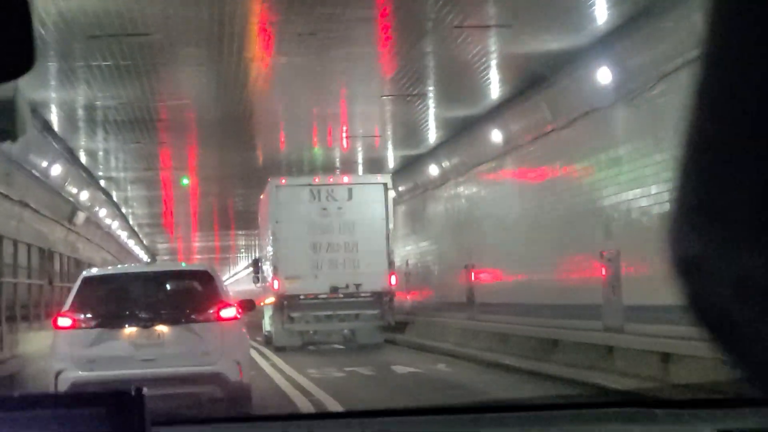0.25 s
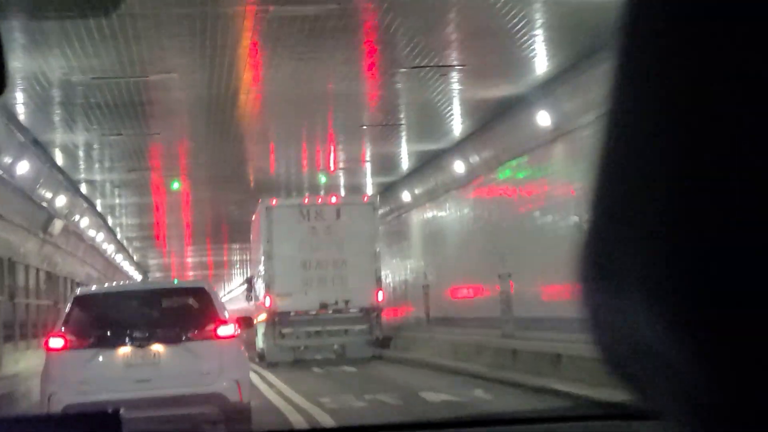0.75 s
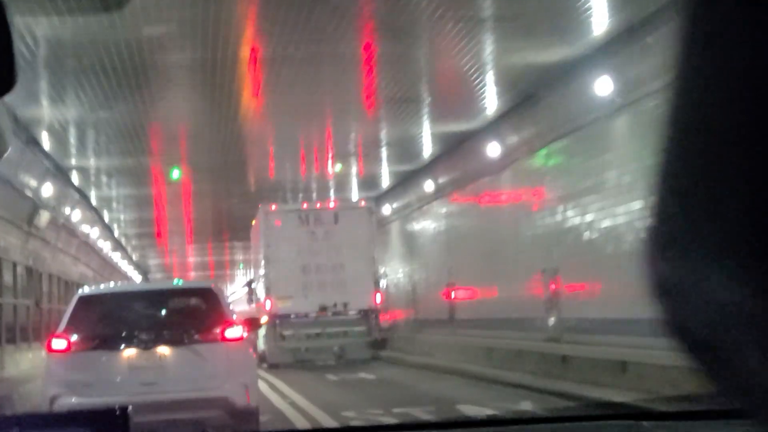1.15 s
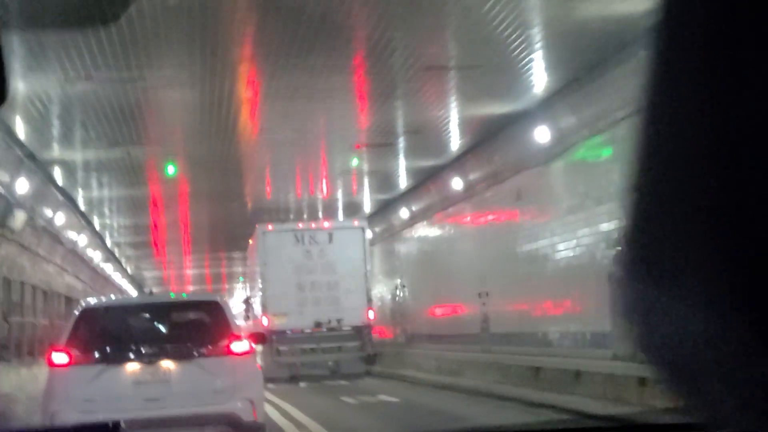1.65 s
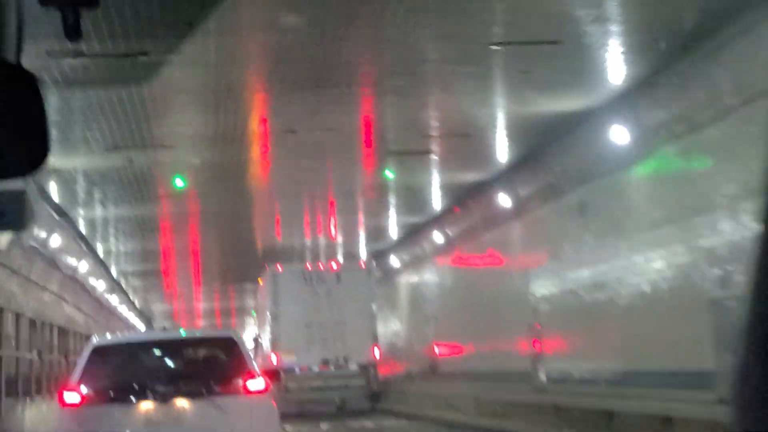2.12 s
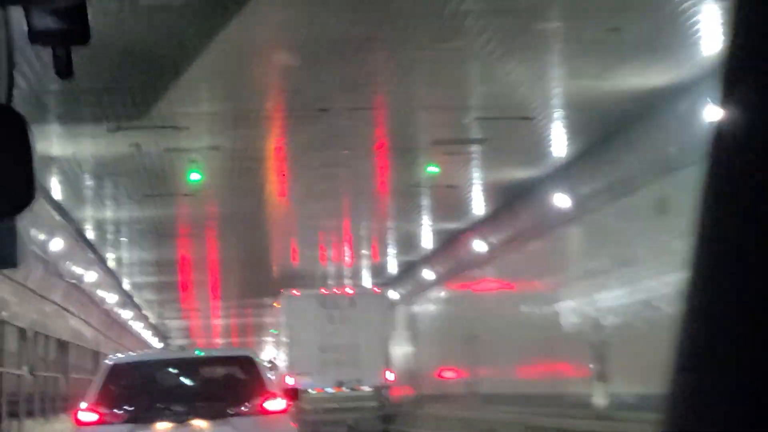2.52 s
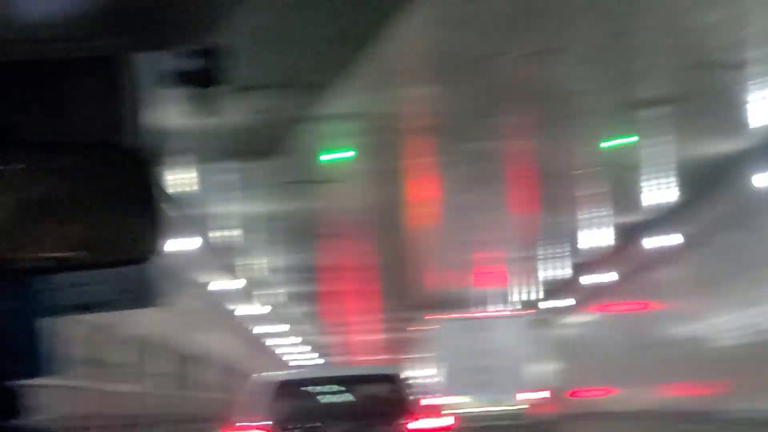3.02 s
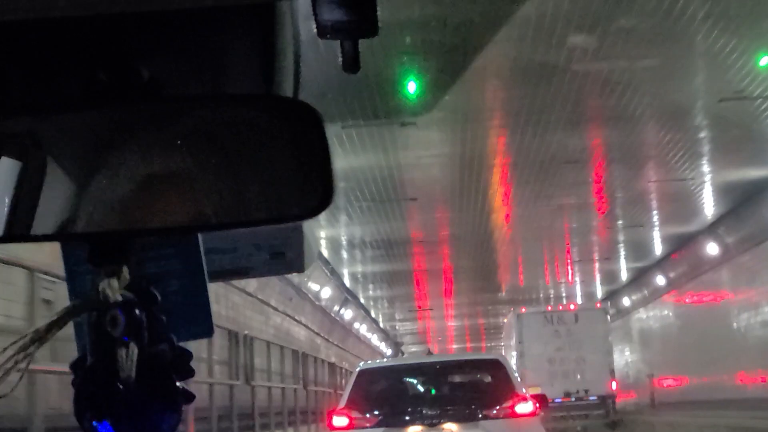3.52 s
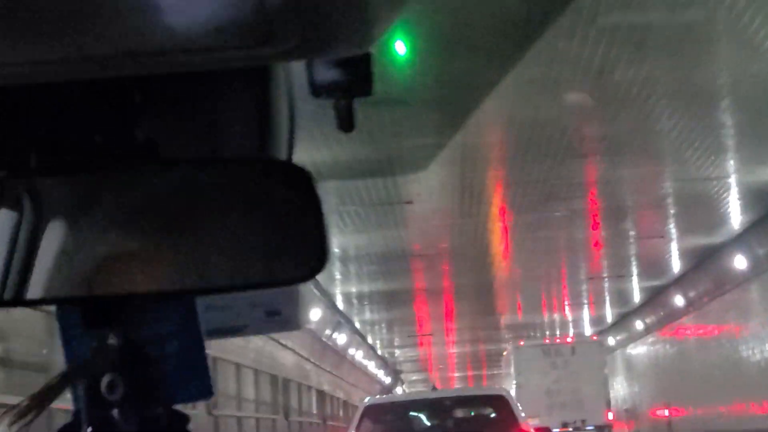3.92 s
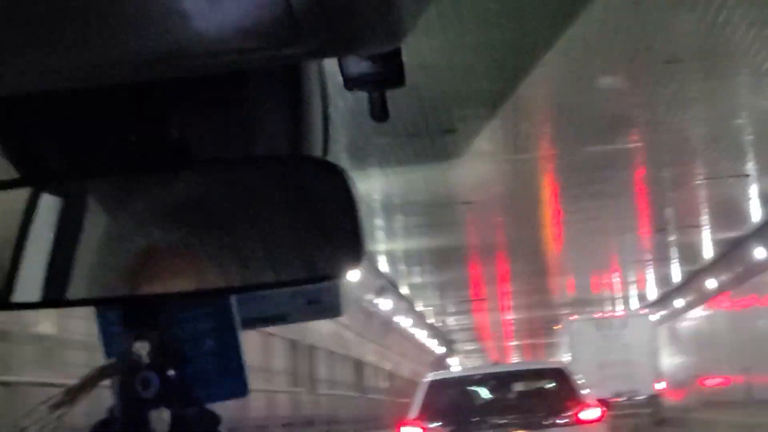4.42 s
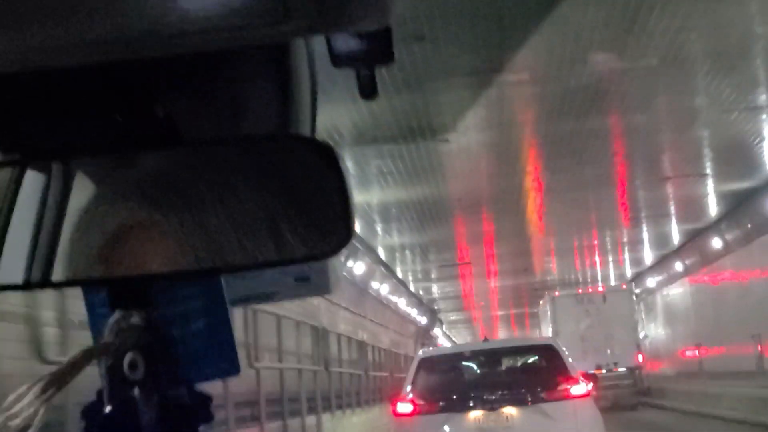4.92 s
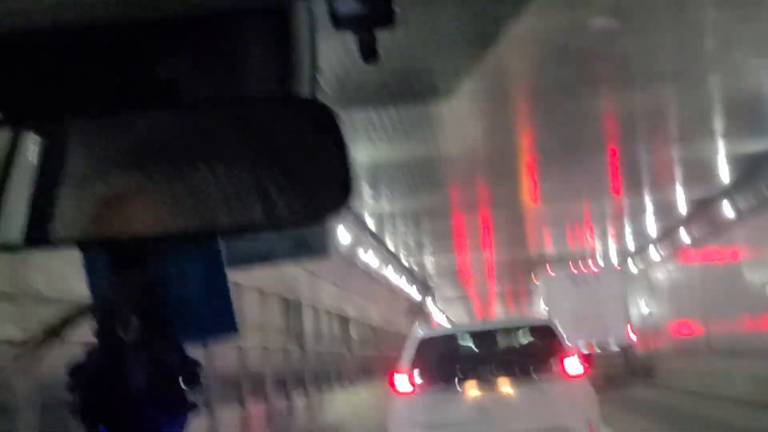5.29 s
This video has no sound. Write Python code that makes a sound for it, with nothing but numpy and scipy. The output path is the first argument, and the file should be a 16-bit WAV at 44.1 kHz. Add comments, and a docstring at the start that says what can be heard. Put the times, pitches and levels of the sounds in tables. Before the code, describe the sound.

A close stereo microphone in the front of a moving car captures deep, uneven road rumble and a wavering cabin boom for about 5.5 seconds. Boom is strongest around 0.5 seconds, when the tyre roar also swells. A higher engine-like drone runs until about 1.9 seconds, then gives way to a lower, fainter hum from 2.2. Between roughly 0.85 and 1.6 seconds, plastic trim gives a faint quick run of dry, bright ticking scrapes, slowing slightly, over a trace of cloth hiss. Air hiss drops around 2 seconds, and muffled tyre rush from tunnel traffic builds towards 3. Soft sleeve rubs come near 2.7 and 3.5-3.7, then clearer grainy brushes at 4.4-4.6 and 5.2-5.5, leaning right. Tiny high clicks fall near 2.9, 3.3, 3.5 and 5.0. A low throb joins between 3.3 and 5.3 seconds. The rumble continues until the end.

```python
"""Car cabin in a road tunnel

Low road noise drums and roars as shaped noise; the cabin booms and drones as wavering sine tones.
A sleeve brushes the right microphone port as grainy noise, trim creaks in a run of faint ringing scrapes,
and small things click as brief narrow rings. Behind them, traffic in the tube is broad noise bands.
A limiter holds the peaks down.
"""
import sys
import numpy as np
from scipy import signal
from scipy.fft import rfft, irfft, next_fast_len
from scipy.io import wavfile
from scipy.ndimage import uniform_filter1d, minimum_filter1d, map_coordinates

SR = 44100
rng = np.random.default_rng(int(sys.argv[2]) if len(sys.argv) > 2 else 0)


def to_wav(sig):
    """Store sig (one row per channel, or 1-D mono) as 16-bit WAV at the path in sys.argv[1].

    Samples outside -1..1 are clipped; the rate is SR.
    """
    pcm = np.clip(np.atleast_2d(sig), -1, 1) * 32767
    pcm = np.round(pcm).astype(np.int16)
    wavfile.write(sys.argv[1], SR, pcm.T)  # frames by channels


N = 244755


def amp(db):
    """Turn decibels into a gain."""
    return 10 ** (np.asarray(db) / 20)


def unit(x):
    """Scale to rms 1."""
    return x / np.sqrt(np.mean(x ** 2) + 1e-20)


def along(points, hz):
    """Read a curve of (frequency, value) points on a log frequency axis."""
    f, v = np.transpose(points)
    return np.interp(np.log(hz + 1), np.log(f + 1), v)


def curves(rows):
    """Draw one automation curve per column after the time, a value per sample."""
    times, *columns = np.transpose(rows)
    t = np.arange(N) / SR
    return [np.interp(t, times, column) for column in columns]


def during(rows, fade):
    """Gate to the time span of a table: 1 inside, fading to 0 over `fade` seconds outside."""
    t = np.arange(N) / SR
    inside = np.minimum(t - rows[0][0], rows[-1][0] - t)
    return np.clip(1 + inside / fade, 0, 1)


def wobble(rate):
    """Draw a smooth random curve through `rate` normally distributed knots a second."""
    knots = rng.standard_normal(int(N * rate / SR) + 4)
    return map_coordinates(knots, [np.arange(N) * rate / SR])


def filtered(x, response):
    """Filter x by a response given as a function of frequency."""
    m = next_fast_len(N + SR // 2)
    spectrum = rfft(x, m) * response(np.fft.rfftfreq(m, 1 / SR))
    return irfft(spectrum, m)[..., :N]


def placed(right_db):
    """Gains of the two ports, with a mean of 1, for a source louder on the right."""
    gains = amp([[0], [right_db]])
    return gains / gains.mean()


# how alike left and right are in the cabin noise: (frequency [Hz], correlation [0 to 1])
STEREO_LIKENESS = [(30, 1), (80, 0.97), (170, 0.88), (350, 0.91), (700, 0.63), (1300, 0), (4000, 0)]


def rush(spectrum, patchy_db):
    """Stereo noise with a given spectrum and patches of random gain; its mid signal has rms 1."""
    noise = signal.stft(rng.standard_normal((2, N)), nperseg=512)[2]
    # blur random gains over frequency, then time, into patches shared by both channels
    patches = uniform_filter1d(rng.standard_normal(noise.shape[1:]), size=5, axis=0)
    patches = uniform_filter1d(patches, size=14, axis=1)
    pair = signal.istft(noise * amp(patchy_db * unit(patches)), nperseg=512)[1][:, :N]

    def mid_side(hz):
        # half the angle whose cosine is the left-right correlation
        angle = np.arccos(np.clip(along(STEREO_LIKENESS, hz), -1, 1)) / 2
        return amp(along(spectrum, hz)) * [np.cos(angle), np.sin(angle)]

    mid, side = filtered(pair, mid_side)
    return np.array([mid + side, mid - side]) / np.std(mid)


def tone(rows, waver_db, drift, order=1):
    """A sine line, or a multiple of it, that wavers at random in level and phase."""
    hz, db = curves(rows)
    phase = order * (2 * np.pi * np.cumsum(hz) / SR + drift * wobble(14))
    level = np.sqrt(2) * amp(db + waver_db * wobble(16))  # a sine of rms 1 peaks at root 2
    return level * np.sin(phase) * during(rows, fade=0.44)


# uneven levels of the low road noise: (time [s], shudder level [dB], cabin rumble level [dB])
ROAD_LEVELS = [(0, -19.5, -9.5), (.4, -22, -13), (1.35, -22, -16.5), (1.7, -17.5, -11), (2.05, -21.5, -14),
               (2.5, -15.5, -12.5), (3.05, -26.5, -11.5), (3.6, -17, -13.5), (4.25, -19, -12),
               (4.65, -18, -13.5), (5.55, -22.5, -12)]
# the drive pulls, eases off and pulls again: (time [s], change in roar level [dB])
DRIVE_LOAD = [(0, 1.5), (.4, 3.5), (.65, 0.5), (1.6, .5), (2.0, -1.43), (3.7, -1), (4.2, 0), (5.55, 0.1)]
# spectra of the low shudder, cabin rumble and tyre roar: (frequency [Hz], relative density [dB per Hz])
SHUDDER_SPECTRUM = [(8, -28.5), (20, -3), (30, -1.5), (42, 0.5), (49, 2), (55, -17.5), (70, -34),
                    (120, -71), (400, -120)]
RUMBLE_SPECTRUM = [(35, -48), (55, -17.5), (64, 4), (76, -3.5), (90, 1.5), (105, 0), (125, 0), (143, -9.5),
                   (180, -9), (215, -11), (270, -19), (500, -57.5), (1200, -120)]
ROAR_SPECTRUM = [(90, -51), (180, -7), (235, -1), (300, -1), (360, -5), (430, -4), (510, -3), (590, -9.5),
                 (720, -16), (950, -29), (2000, -64), (4000, -120)]
ROAR_DB = -24  # at a load of 0 dB
SWELL_DB, SWELLS_PER_S = 0.88, 5  # chance swells of the shudder and the rumble


def road():
    """Road noise in three bands: an uneven low shudder and rumble, and a tyre roar that grows with load."""
    shudder_db, rumble_db = curves(ROAD_LEVELS)
    load_db, = curves(DRIVE_LOAD)
    shudder_gain = amp(shudder_db + SWELL_DB * wobble(SWELLS_PER_S))
    rumble_gain = amp(rumble_db + SWELL_DB * wobble(SWELLS_PER_S))
    shudder = shudder_gain * rush(SHUDDER_SPECTRUM, patchy_db=1.6)
    rumble = rumble_gain * rush(RUMBLE_SPECTRUM, patchy_db=0.5) * placed(right_db=1.0)
    roar = amp(ROAR_DB + load_db) * rush(ROAR_SPECTRUM, patchy_db=1.0) * placed(right_db=0.46)
    return shudder + rumble + roar


# tone tracks: (time [s], pitch [Hz], level before the layer's trim [dB])
# the cabin boom: near 80 Hz at first, then lower, wandering and uneven in level
BOOM_TRACK = [(0, 76.2, -12.5), (.25, 80.95, -8.5), (.47, 82, -4), (.55, 81.7, -17.5), (.64, 82.17, -5),
              (1.03, 80.66, -11), (1.2, 81.16, -6.5), (1.43, 81.04, -7), (1.55, 84.23, -17.5),
              (2.05, 71.03, -10.5), (2.25, 70.86, -16.5), (3.2, 66, -16.5), (3.7, 79, -11),
              (4.1, 70.83, -23.5), (4.45, 81, -13), (4.75, 72, -16.5), (4.97, 78, -13), (5.55, 78.54, -12)]
# the higher drone while the drive pulls
DRONE_TRACK = [(0, 182.1, -17), (.27, 201.1, -11.5), (.55, 202, -23), (.8, 198.8, -16), (1.0, 199.2, -23),
               (1.3, 198.2, -24.5), (1.65, 196.4, -16.5), (1.85, 201.9, -26.5)]
# the hum that sets in once the drive eases off
HUM_TRACK = [(2.2, 158.3, -20.5), (3.0, 157.8, -22), (3.45, 158, -28), (3.9, 159.5, -23),
             (4.6, 157.1, -24.5), (5.55, 157.5, -19)]
# a low throb, late in the scene
THROB_TRACK = [(3.3, 44, -24.5), (4.6, 44.06, -17.5), (5.3, 42.3, -26)]


def cabin_tones():
    """Wavering sine lines: a cabin boom, a drone with a faint octave, a hum and a low throb."""
    boom = amp(-0.53) * tone(BOOM_TRACK, waver_db=1.36, drift=0.64)
    drone = amp(-1.14) * tone(DRONE_TRACK, waver_db=1.5, drift=0.5)
    octave = amp(-18) * tone(DRONE_TRACK, waver_db=1.5, drift=0.74, order=2)
    hum = amp(-2.0) * tone(HUM_TRACK, waver_db=1.0, drift=0.18)
    throb = amp(-3.0) * tone(THROB_TRACK, waver_db=5.0, drift=0.2)
    return (boom + drone + octave + hum) * placed(right_db=0.56) + throb


STROKE_DROP_DB = 15  # how far a stroke is down one rise time before its peak, or one fall time after


def stroke(peak, rise, fall):
    """Envelope of one sleeve stroke: swells to 1 at its peak, then dies away, both straight in dB."""
    t = np.arange(N) / SR - peak
    return amp(-STROKE_DROP_DB * np.maximum(-t / rise, t / fall))


# sleeve strokes: (peak time [s], rise [s], fall [s], rub level [dB], hiss level [dB])
SLEEVE_STROKES = [(1.795, 0.066, .08, -61, -67.5), (2.62, 0.12, 0.16, -53, -65.5),
                  (2.72, .12, 0.24, -52.5, -63.5), (3.221, 0.54, .2, -62, -69.5),
                  (3.465, .045, .045, -52, -62.5), (3.725, .09, .07, -49, -65),
                  (4.40, 0.18, 0.12, -43.5, -55), (4.62, .14, 0.16, -42.5, -48),
                  (5.065, 0.11, 0.23, -52.5, -63.5), (5.228, 0.054, 0.067, -44, -62),
                  (5.40, .11, 0.63, -46, -50.5), (5.545, 0.042, 0.083, -42, -46.5)]
# cloth stirring under the creak: (time [s], hiss level [dB])
CLOTH_STIR = [(0.75, -87), (0.95, -76.5), (1.3, -71), (1.75, -75.5), (1.9, -89)]
# spectra of the dull rub and of the bright cloth hiss: (frequency [Hz], relative density [dB per Hz])
RUB_SPECTRUM = [(500, -36.5), (1300, 0), (2000, -2.5), (2600, -4.5), (3400, 0.5), (4100, -4.5), (5000, -8),
                (6000, -18.5), (8000, -42.5), (15000, -65)]
CLOTH_SPECTRUM = [(2000, -22), (4500, -1.5), (5800, 1), (6800, 0.5), (8900, 2.5), (10000, -0.5),
                  (11600, 4.5), (13200, 2), (14300, -3), (15800, 0.5)]
CLUMP_DB, FIBRE_DB = 1.2, 1.5  # grain depth as fibres catch in clumps and one by one


def sleeve():
    """Cloth slides by the right port: a dull rub and a bright hiss, grainy as the fibres catch."""
    stir_db, = curves(CLOTH_STIR)
    rub = np.zeros(N)
    hiss = amp(stir_db) * during(CLOTH_STIR, fade=0.1)
    for peak, rise, fall, rub_db, hiss_db in SLEEVE_STROKES:
        shape = stroke(peak, rise, fall)
        rub = np.hypot(rub, amp(rub_db) * shape)  # overlapping strokes add in power
        hiss = np.hypot(hiss, amp(hiss_db) * shape)
    grain = unit(amp(CLUMP_DB * wobble(60) + FIBRE_DB * wobble(700)))
    dull = rub * rush(RUB_SPECTRUM, patchy_db=0.8) * placed(right_db=7.5)
    bright = hiss * rush(CLOTH_SPECTRUM, patchy_db=0.4) * placed(right_db=12.0)
    return (dull + bright) * grain


# first slip, gap between slips, and how much each gap outlasts the one before
CREAK_S, SLIP_GAP_S, SLIP_SLOWING_S = 0.8425, 0.0585, 0.00085
SLIP_JITTER_S = 0.002
# level of the third slip before filter and trim, the build per slip up to it, the ebb after, the scatter
SLIP_DB, SLIP_BUILD_DB, SLIP_EBB_DB, SLIP_SCATTER_DB = -45, 5, 0.6, 1.5


def slips(count=13):
    """Time [s] and level [dB] of each slip: the trim sticks a little longer every time, give or take."""
    k = np.arange(count)
    late, louder = rng.standard_normal((count, 2)).T
    times = CREAK_S + SLIP_GAP_S * k + SLIP_SLOWING_S * k ** 2 / 2
    levels = SLIP_DB + np.minimum(SLIP_BUILD_DB * (k - 2), -SLIP_EBB_DB * (k - 2))
    return zip(times + SLIP_JITTER_S * late, levels + SLIP_SCATTER_DB * louder)


# the plastic trim's modes: (frequency [Hz], width [Hz], relative level [dB])
TRIM_MODES = [(4900, 900, 3.5), (7300, 900, -7.5), (9300, 380, 1.5), (11200, 1200, -8.5), (13200, 1500, -5)]


def trim_body(f):
    """Size of the trim's response: resonant modes of alternating sign, plus a broad scrape in power."""
    modes = 0
    for k, (centre, width, db) in enumerate(TRIM_MODES):
        damping = 1j * f * width
        modes = modes + (-1) ** k * amp(db) * damping / (centre * centre - f * f + damping)
    return np.hypot(np.abs(modes), amp(along(CLOTH_SPECTRUM, f) - 13.5))


def creak(decay=0.06, rise=0.002):
    """Each slip of the trim is a short noise scrape, part of it ringing in the plastic's modes."""
    scrapes = np.zeros((2, N + SR))
    t = np.arange(SR // 10) / SR
    for s, db in slips():
        shape = amp(db - 60 * t / decay) * (1 - np.exp(-t / rise))  # falls 60 dB in `decay` seconds
        start = round(s * SR)
        scrapes[:, start:start + len(t)] += shape * rng.standard_normal((2, len(t)))
    return amp(4.0) * filtered(scrapes[:, :N], trim_body) * placed(right_db=5.0)


# small clicks of things in the cabin: (time [s], level before trim [dB], pitch [Hz])
CABIN_CLICKS = [(2.8973, -52, 12040), (3.2705, -46, 11860), (3.461, -57, 8700), (4.9654, -53, 8280)]


def clicks(decay=0.06, width_hz=600):
    """Light contacts, each a narrow band of noise that starts at once and dies away fast."""
    out = np.zeros((2, N))
    t = np.arange(N) / SR
    for s, db, hz in CABIN_CLICKS:
        band = lambda f: 1 / (1 + ((f - hz) / width_hz) ** 2)
        ring = unit(filtered(rng.standard_normal((2, N)), band))
        out += ring * (t >= s) * amp(db - 9.5 - 60 * np.abs(t - s) / decay)
    return out * placed(right_db=7)


# traffic beyond the windows: (time [s], tunnel wash level before trim [dB], tyre rush level [dB])
TUNNEL_TRAFFIC = [(0, -38.5, -50), (.5, -40, -55), (1.6, -40.5, -59), (1.95, -43, -54), (3.0, -44.5, -40),
                  (3.7, -44, -39.5), (4.2, -41.5, -43), (4.8, -41.5, -37), (5.55, -40, -40)]
# air and tyre hiss, dropping as the drive eases off: (time [s], level before trim [dB])
AIR_HISS = [(0, -45.5), (1.55, -47), (2.0, -51), (5.55, -50)]
# spectra of the wash, the tyre rush and the hiss: (frequency [Hz], relative density [dB per Hz])
WASH_SPECTRUM = [(300, -46), (600, -8), (780, -1), (950, -3), (1150, -2.5), (1350, -9.5), (1650, -12.5),
                 (2100, -26), (3500, -43), (8000, -120)]
TYRE_SPECTRUM = [(300, -47.5), (540, -8.5), (670, 4), (780, -3.5), (920, -6), (1100, -18.5), (1800, -56.5),
                 (4000, -120)]
HISS_SPECTRUM = [(700, -28), (1400, -0.5), (2000, 3), (2900, 0), (3600, 1), (4300, -0.5), (5300, -7),
                 (5800, -15.5), (6400, -24), (8800, -30), (9900, -32), (11600, -33), (15500, -35)]


def traffic():
    """The tunnel's diffuse wash, a rush of tyres that builds up, and the hiss that gets past the glass."""
    wash_db, tyres_db = curves(TUNNEL_TRAFFIC)
    air_db, = curves(AIR_HISS)
    wash = amp(wash_db + 1.06) * rush(WASH_SPECTRUM, patchy_db=0.56) * placed(right_db=1.0)
    tyres = amp(tyres_db) * rush(TYRE_SPECTRUM, patchy_db=4.0) * placed(right_db=3.5)
    hiss = amp(air_db - 2.5) * rush(HISS_SPECTRUM, patchy_db=0.97) * placed(right_db=3.0)
    return wash + tyres + hiss


def scene():
    """Mix everything heard from the front seat."""
    return road() + cabin_tones() + sleeve() + creak() + clicks() + traffic()


TOP_HZ = 15800  # band limit


def record(dry, ceiling=0.99):
    """A look-ahead limiter rides the peaks; the ends fade briefly; nothing passes above the band limit."""
    needed = np.minimum(1, ceiling / (np.abs(dry).max(axis=0) + 1e-9))
    held = minimum_filter1d(needed, size=600)  # centred windows, so the gain dips ahead of a peak
    gain = uniform_filter1d(held, size=600)
    ends = signal.windows.tukey(N, 160 / N)  # 80 samples of fade at each end
    return filtered(dry * gain * ends, lambda hz: hz < TOP_HZ)


dry = scene()
out = record(dry)
to_wav(out)
```